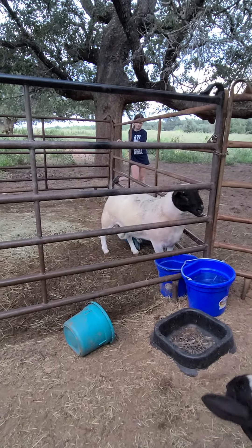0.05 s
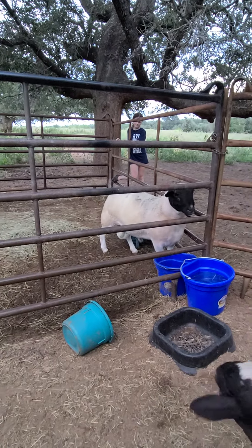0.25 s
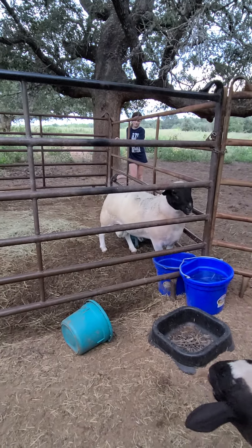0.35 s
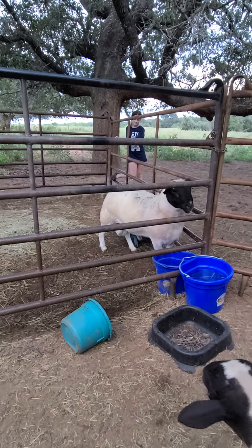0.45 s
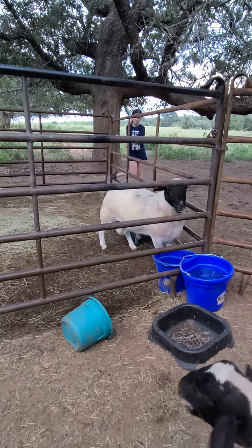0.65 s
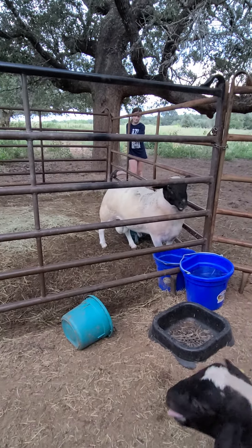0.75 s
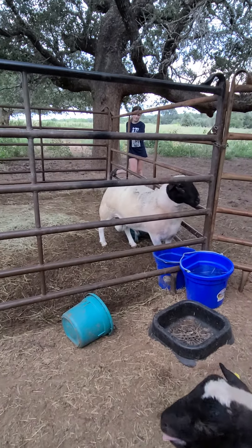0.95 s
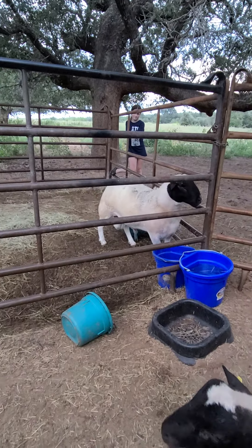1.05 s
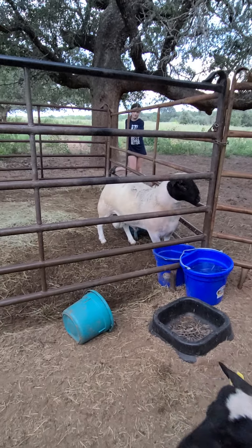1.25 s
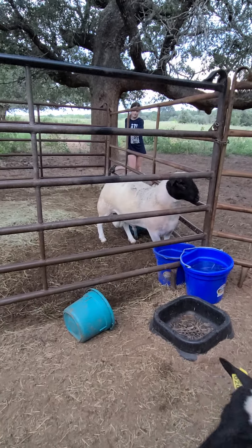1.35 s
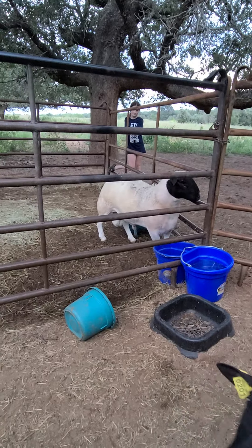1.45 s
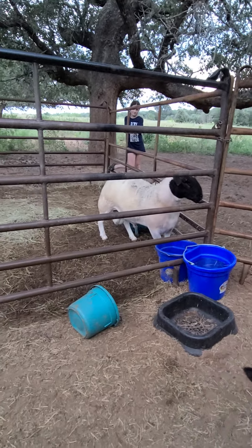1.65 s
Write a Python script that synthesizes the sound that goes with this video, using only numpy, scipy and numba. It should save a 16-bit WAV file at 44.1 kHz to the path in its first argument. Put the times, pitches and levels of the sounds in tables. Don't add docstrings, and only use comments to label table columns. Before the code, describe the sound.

A ram takes a faint gasp and bleats once, hoarse and throbbing, slightly right. Then a quieter creaky animal grunt and small straw ticks on the left, over faint outdoor rustle; phone stereo microphone a few metres away.

```python
import sys
import numpy as np
from scipy import signal
from scipy.fft import rfft, irfft, next_fast_len
from scipy.io import wavfile
from scipy.ndimage import uniform_filter1d, map_coordinates
from numba import njit

SR = 44100
rng = np.random.default_rng(int(sys.argv[2]) if len(sys.argv) > 2 else 0)


def unload_audio(sound):
    columns = np.transpose(np.atleast_2d(sound))
    steps = np.round(np.clip(columns, -1, 1) * 32767)
    wavfile.write(sys.argv[1], SR, steps.astype(np.int16))


def undo_db(level):
    steps = np.asarray(level, float) / 20
    return 10 ** steps


N = 74970
T = np.arange(N) / SR

# start_s, length_s, level_db, roughness (0-1)
THROBS = [(0.187, .022, -42.5, 0.87), (.212, 0.01, -22.5, 0.84), (0.234, 0.047, -20, 0.97),
          (0.299, 0.041, -15, 0.71), (0.351, 0.089, -17, 0.97), (0.424, 0.055, -15.5, 0.7),
          (0.494, 0.073, -18, 0.79), (0.579, 0.06295, -18, 0.7), (.662, .046, -18, .14),
          (.731, .009, -22, .5), (.749, .047, -18.5, .18), (0.824, .056, -20.5, 0.63),
          (0.922, 0.043, -17, 0.53), (1.005, 0.0036, -20, 0.94), (1.01, 0.013, -29, 0.6)]
# time_s, first_resonance_hz, strain_db, nasal_db
MOUTH = [
    (.18, 790, 8.5, 4),
    (.3, 840, 0.5, -4),
    (.43, 907, -2, 2.5),
    (.6, 878, -4.5, 1.5),
    (.69, 946, -2.5, 2),
    (.78, 918.5, -4, 6.5),
    (.95, 911.2, -4, 4.5),
    (1.008, 800, 3.5, 2.5),
    (1.03, 700, 3, 21.5),
]
# time_s, boost_db
CRACKS = [
    (.293, 6.5),
    (0.351, 5.5),
    (0.403, 9),
    (.474, -0.5),
    (0.584, 11.5),
    (0.843, 7.5),
    (1.003, 7),
]
# centre_hz, width_hz, level_db
LOW_THROAT = [(620, 200, -22), (730, 130, -17), (1100, 200, -10), (1370, 160, -11), (1800, 260, -19),
              (2220, 280, -12)]
UPPER_THROAT = [(1745, 178, -9), (2123, 200, -11.5), (2574, 410, -13.5), (3300, 394, -13.5),
                (4430, 1380, -18)]
AIRY_THROAT = [(5185, 1030, -19), (7380, 2200, -29.5), (9000, 1050, -31), (12060, 7100, -27),
               (15100, 1940, -43)]
NASAL_THROAT = [(382.8, 85, -21.5)]
# centre_hz, width_hz, level_db
GASP_THROAT = [(356, 100, -3), (1470, 510, -1), (1820, 250, 3.5), (2736, 780, -5.5), (3160, 690, -6),
               (4020, 574, -13), (5070, 1200, -3), (11500, 2000, -20.5)]
# time_s, peak_db
CREAKS = [
    (1.338, -43),
    (1.362, -35),
    (1.374, -36),
    (1.391, -34.5),
    (1.408, -29.5),
    (1.434, -24),
    (1.435, -65),
    (1.497, -26.5),
]
# centre_hz, width_hz, level_db
GRUNT_THROAT = [(380, 200, -7), (700, 240, -8), (1007, 310, 0), (1440, 440, -6), (1920, 420, -8),
                (3000, 730, -16.5), (4200, 1000, -26)]
# time_s, peak_db, ring_hz, width_hz
TICKS = [
    (1.224, -36, 11500, 3000),
    (1.306, -36.5, 3300, 2180),
    (1.624, -47, 1993, 1227),
    (1.664, -60, 11500, 2480),
    (1.68, -50.5, 1900, 600),
]
# pitch_hz, level_db (rms)
HUM = [
    (59.2, -61.5),
    (118.4, -67.5),
    (183.0, -68),
    (236.9, -70.5),
]
# frequency_hz, level_db (per Hz)
RUSTLE = [(24, -31), (40, 4.5), (197, -6), (241, -8), (1220, -19), (7340, -28.5), (9410, -37), (15500, -25)]
# frequency_hz, difference_db
PORT_COLOUR = [(100, -1.5), (700, -2.3), (1300, -.6), (2400, -2.5), (4400, -4), (8000, 3.3), (15000, 3.6)]


def ram():
    throbs, mouth = np.array(THROBS), np.array(MOUTH)
    each = np.array([swell(s, n, db, 2492.5, 901) for s, n, db, _ in THROBS])
    air_db = np.max([swell(s, n, db, 1192, 584.5) for s, n, db, _ in THROBS], axis=0)
    env = undo_db(each.max(axis=0))
    rough = uniform_filter1d(np.clip(throbs[each.argmax(axis=0), 3], 0, 1), size=300)
    first_hz, strain_db, nasal_db = (np.interp(T, mouth[:, 0], c) for c in mouth.T[1:])
    crack_s = 0.0028
    cracks = [db * np.exp(-((T - s) / crack_s) ** 2) for s, db in CRACKS]
    strain = undo_db(strain_db + np.max(cracks, axis=0))

    clear_hz, hoarse_hz = 241, 198
    pulses, breath = voice(clear_hz + (hoarse_hz - clear_hz) * rough, rough)
    low = env * (pulses + undo_db(-6) * rough * breath[0])
    pulses = pulses * env
    breath = breath * undo_db(air_db + 13)
    bleat = level(band(low, first_hz, 162), 0) + ring(low, LOW_THROAT)
    bleat = bleat - ring(low * undo_db(nasal_db), NASAL_THROAT)
    bleat = bleat + level(band(low, 170, 300), -30)
    bleat = bleat + flares(0.13 * pulses, breath, AIRY_THROAT, 0.6)
    bleat = bleat + flares(strain * pulses, strain * breath, UPPER_THROAT, 0.3)

    gasp_env = undo_db(swell(0.098, 0.044, -41.5, 800, 1300))
    pulses, breath = voice(np.full(N, 104.), np.full(N, .4))
    gasp = ring(gasp_env * (0.55 * pulses + breath[0]), GASP_THROAT)
    return level(bleat, 0) * rms(env) + level(gasp, 0) * rms(gasp_env)


def voice(hz, rough):
    jitter, shimmer_db, weak_db = .3, 4, -10
    neper = np.log(10) / 20
    chance = rng.standard_normal((N // 40, 2))
    pulses, phase = folds(hz, rough, chance, jitter, shimmer_db * neper, weak_db * neper)
    puff = np.exp(-phase)
    gust = undo_db(2.5 * walk(90.2))
    breath = puff * gust * rng.standard_normal((3, N)) * (4.2 + rough)
    return level(pulses - pulses.mean(), 0), level(breath, 0)


@njit
def folds(hz, rough, chance, jitter, shimmer, weak):
    pulses, phase = np.zeros(len(hz) + 1), np.empty(len(hz))
    p, k = 0., 0
    for i in range(len(hz)):
        step = hz[i] * np.exp(jitter * rough[i] * chance[k, 0]) / SR
        p += step
        if p >= 1:
            p, k = p - 1, k + 1
            size = np.exp(rough[i] * (shimmer * chance[k, 1] + weak * (k % 2)))
            pulses[i] += size * p / step
            pulses[i + 1] += size * (1 - p / step)
        phase[i] = p
    return pulses[:-1], phase


def flares(pulses, breath, peaks, apart):
    share = np.clip(apart, 0, 1)
    x = pulses + np.sqrt(1 - share) * breath[0] + np.sqrt(share) * breath[1:]
    out = 0
    for hz, width, db in peaks:
        flare = undo_db(2 * walk(130))
        out = out + level(np.array([band(flare * c, hz, width) for c in x]), db)
    return out


def grunt():
    env = undo_db(swell(1.452, 0.038, -38.5, 1160, 463))
    pulses, breath = voice(np.full(N, 345.4), np.full(N, .7))
    rattle = level(ring(env * (pulses + .7 * breath[0]), GRUNT_THROAT), 0) * rms(env)
    hits = clicks(CREAKS)
    creaks = ring(hits, GRUNT_THROAT)
    return rattle + creaks * undo_db(-2.5) * hits.max() / np.abs(creaks).max()


def ticks():
    return sum(band(clicks([row]), *row[2:]) * SR / row[3] / 3 for row in TICKS)


def field():
    rustle, shape, gust = 0, np.array(RUSTLE), walk(2.9)
    for hz in 45 * 2 ** np.arange(0, 8.9, .5):
        mid, side = (band(rng.standard_normal(N), hz, hz / 3) for _ in range(2))
        db = np.interp(np.log(hz), np.log(shape[:, 0]), shape[:, 1]) + .7 * gust + 1.8 * walk(8)
        spread = min(hz / 970.0, 1) * np.array([[1], [-1]])
        rustle = rustle + undo_db(db) * (mid + spread * side)
    insects = np.array([band(rng.standard_normal(N), 9470, 920) for _ in range(2)])
    insects = insects * undo_db(1.5 * walk(26))
    hum = 0
    for hz, db in HUM:
        hum = hum + np.sqrt(2) * undo_db(db + 2 * walk(4)) * np.sin(2 * np.pi * (hz * T + rng.random()))
    return level(rustle, -60) + level(insects, -68) + hum


def rms(x):
    return np.sqrt(np.mean(x ** 2))


def level(x, db):
    return x * undo_db(db) / rms(x)


def swell(start_s, length_s, db, attack_db_s, release_db_s):
    rise = (T - start_s) * attack_db_s
    fall = (start_s + length_s - T) * release_db_s
    return db + np.minimum(0, np.minimum(rise, fall))


def walk(rate_hz):
    k = int(SR / rate_hz)
    steps = np.repeat(rng.standard_normal(N // k + 1), k)
    return level(uniform_filter1d(uniform_filter1d(steps, k), k)[:N], 0)


def clicks(rows):
    x = np.full(N, 1e-18)
    for row in rows:
        x[int(row[0] * SR)] = undo_db(row[1])
    return x


def ring(x, peaks):
    return sum((-1) ** k * level(band(x, hz, w), db) for k, (hz, w, db) in enumerate(peaks))


def band(x, hz, width):
    hz = hz * np.ones(N)
    return svf(svf(x, hz, 1.065 * width), hz, 1.2 * width)


@njit
def svf(x, hz, width):
    y, b, l = np.empty(len(x)), 0., 0.
    for i in range(len(x)):
        g, k = np.tan(np.pi * hz[i] / SR), width / hz[i]
        v = (b + g * (x[i] - l)) / (1 + g * (g + k))
        b, l, y[i] = 2 * v - b, l + 2 * g * v, k * v
    return y


def ports(x, lag_s):
    t60_s, pen_db, pen_low_hz, pen_top_hz = 0.27, -20.5, 1530, 4060
    tail_n = SR // 2
    size = next_fast_len(N + tail_n)
    hz = np.arange(size // 2 + 1) * SR / size + 1e-9
    colour, sides = np.array(PORT_COLOUR), np.array([[1], [-1]])
    tilt_db = np.interp(np.log(hz), np.log(colour[:, 0]), colour[:, 1]) / 2
    decay = undo_db(-60 * T[:tail_n] / t60_s)
    tail = level(rng.standard_normal((2, tail_n)) * decay, pen_db) / np.sqrt(tail_n)
    pen = rfft(tail, size) / np.hypot(1, hz / pen_top_hz) / np.hypot(1, pen_low_hz / hz)
    both = x * np.ones((2, 1))
    late = [map_coordinates(c, [(T - s * lag_s / 2) * SR], mode="mirror") for c, s in zip(both, (1, -1))]
    return irfft(rfft(late, size) * undo_db(tilt_db * sides) * (1 + pen), size)[:, :N]


def scene():
    facing_lag_s, turned_lag_s = 0.0002923, 0.00027
    turn = 1 / (1 + np.exp((0.92 - T) / 0.013))
    right = undo_db(0.5) * ports(ram(), facing_lag_s + (turned_lag_s - facing_lag_s) * turn)
    left = ports(grunt() + ticks(), -0.00011) * undo_db(np.array([[1.4], [-1.4]]))
    return right + left + field()


def top_cut(x):
    return signal.sosfilt(signal.butter(12, 15950, fs=SR, output="sos"), x)


def record(dry):
    mix = np.tanh(1.363 * dry) / 0.79
    return top_cut(mix)


dry = scene()
out = record(dry)
unload_audio(out)
```